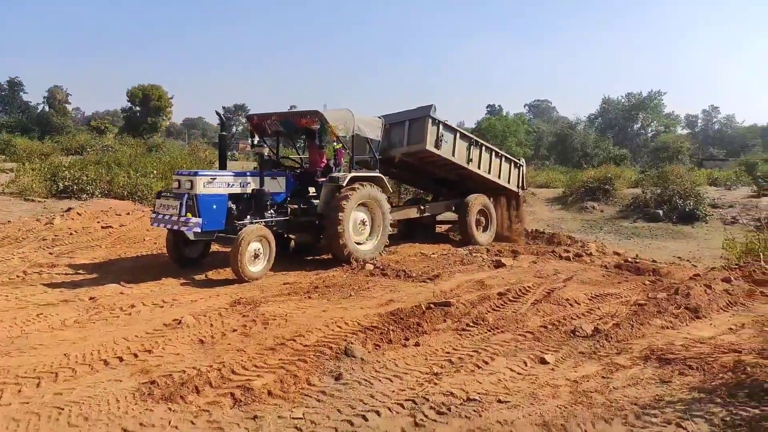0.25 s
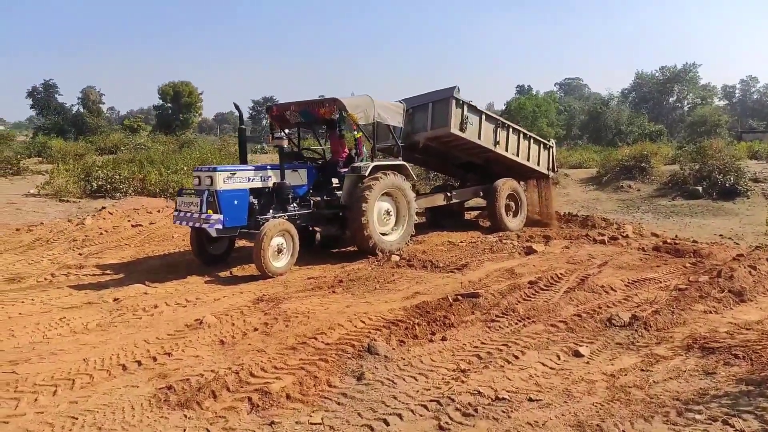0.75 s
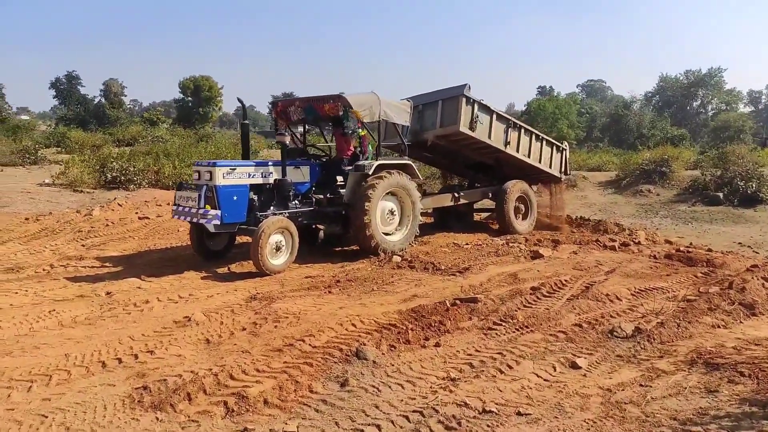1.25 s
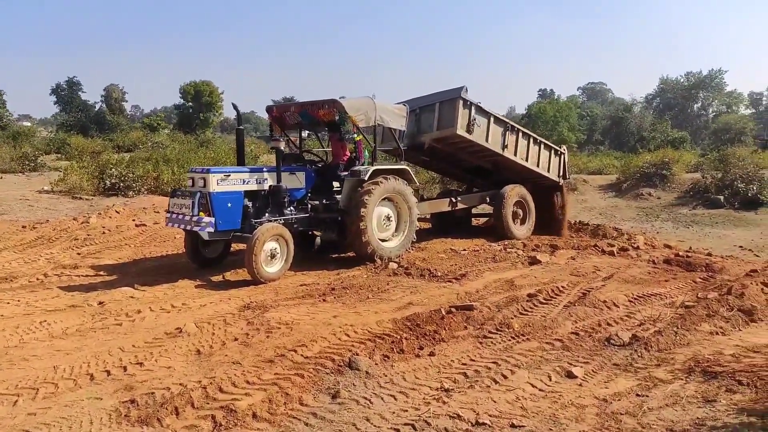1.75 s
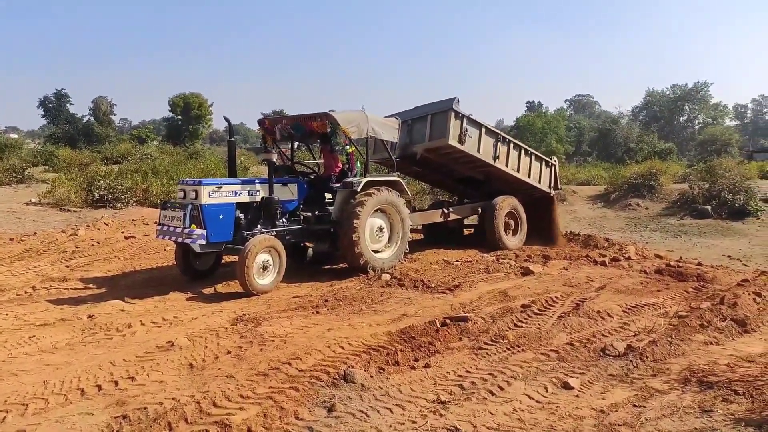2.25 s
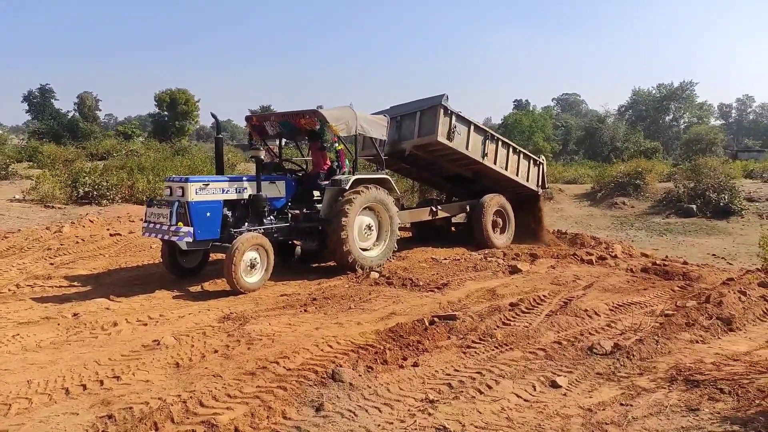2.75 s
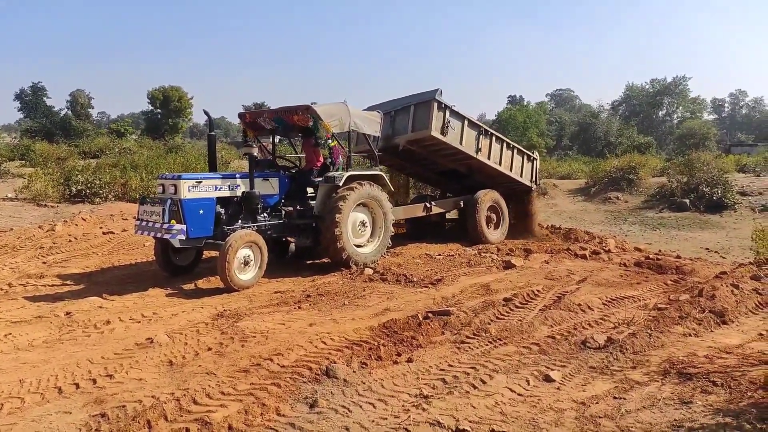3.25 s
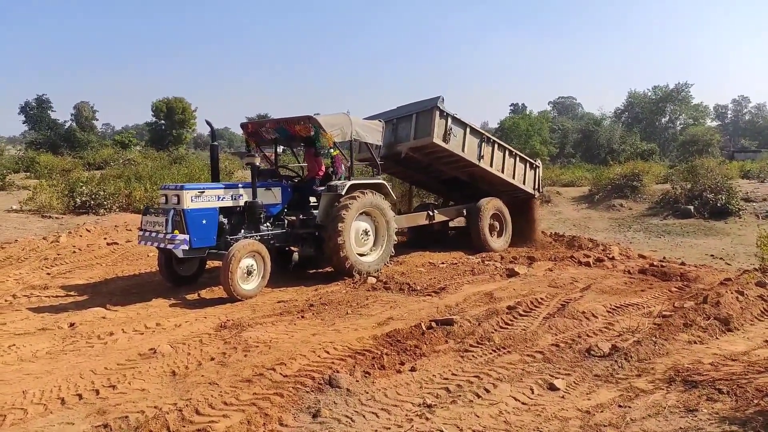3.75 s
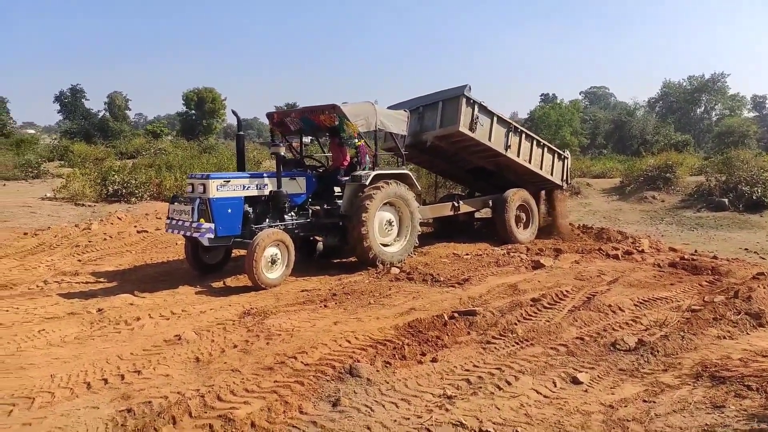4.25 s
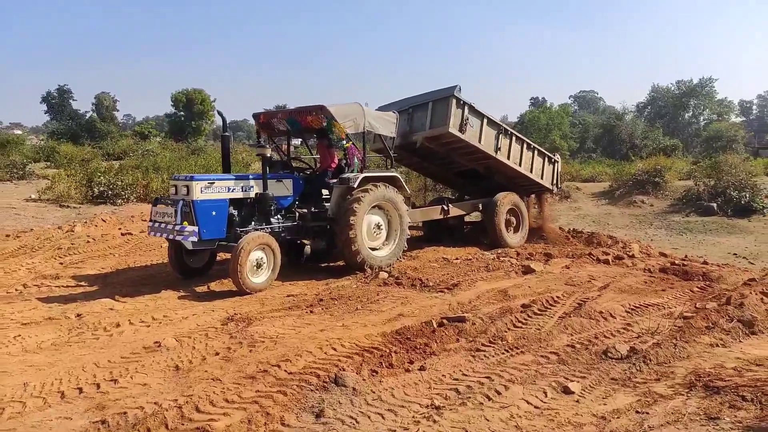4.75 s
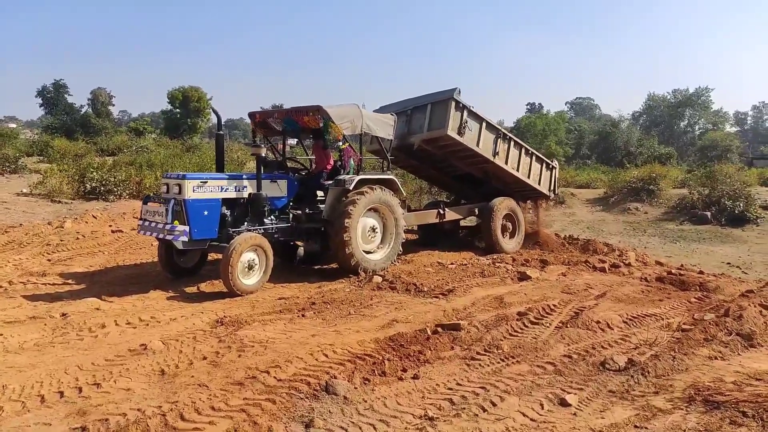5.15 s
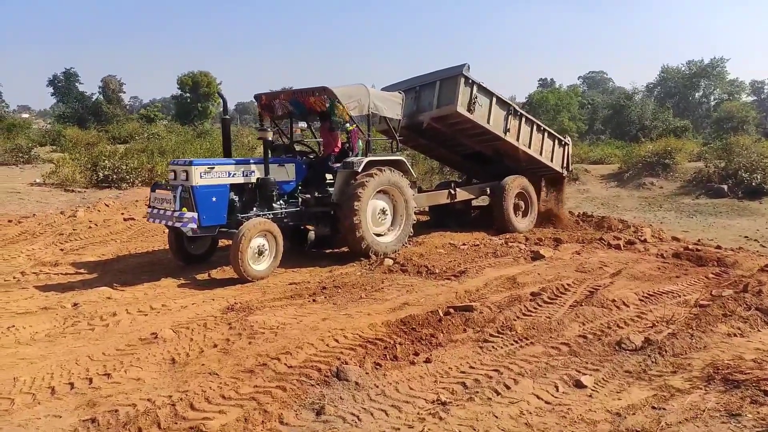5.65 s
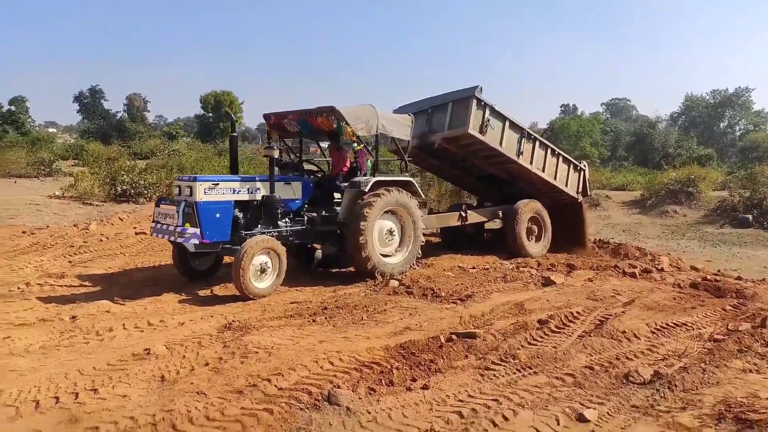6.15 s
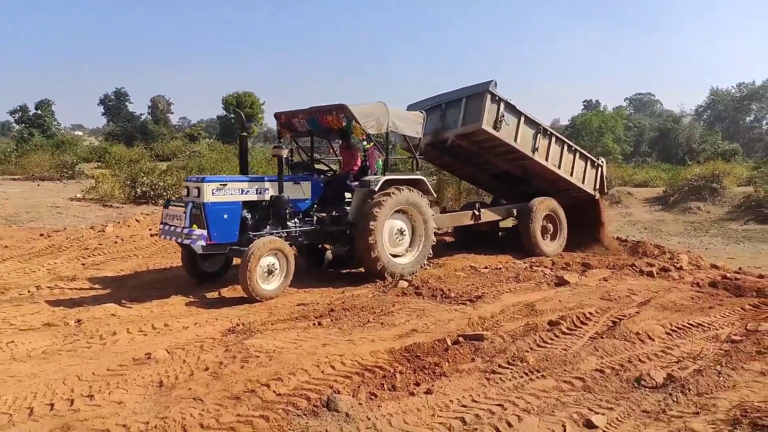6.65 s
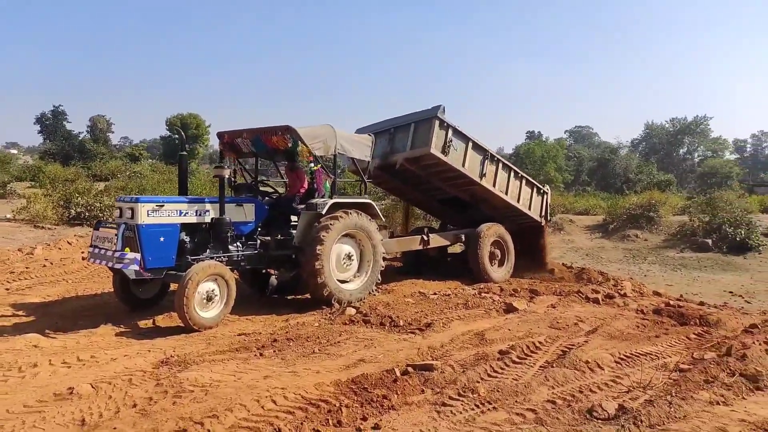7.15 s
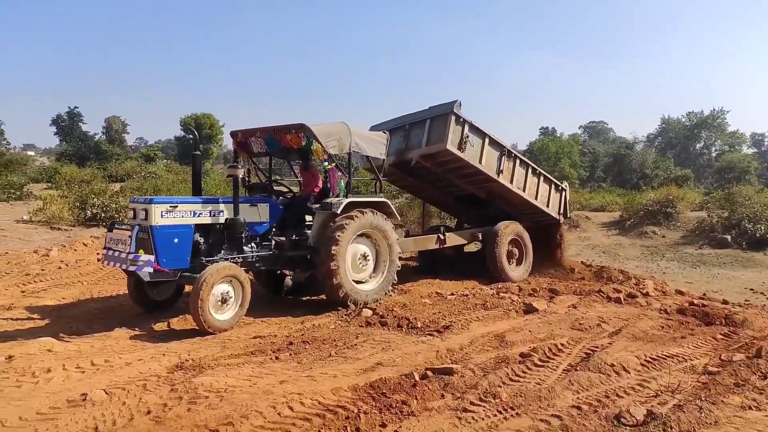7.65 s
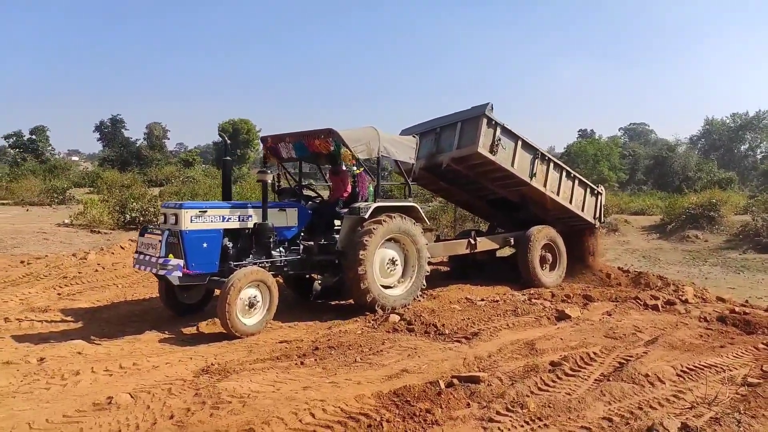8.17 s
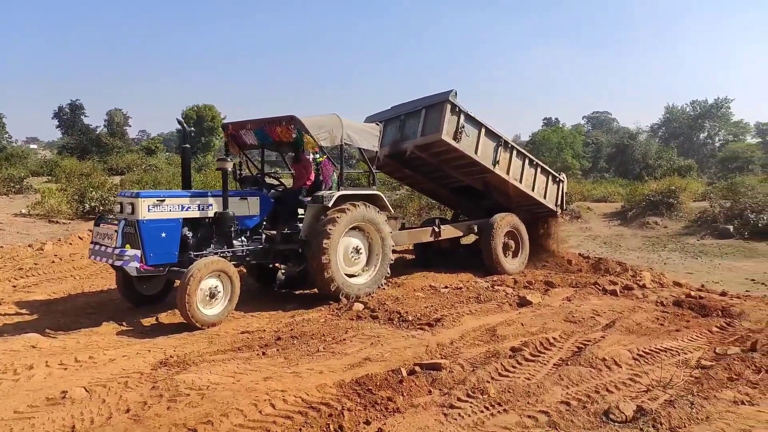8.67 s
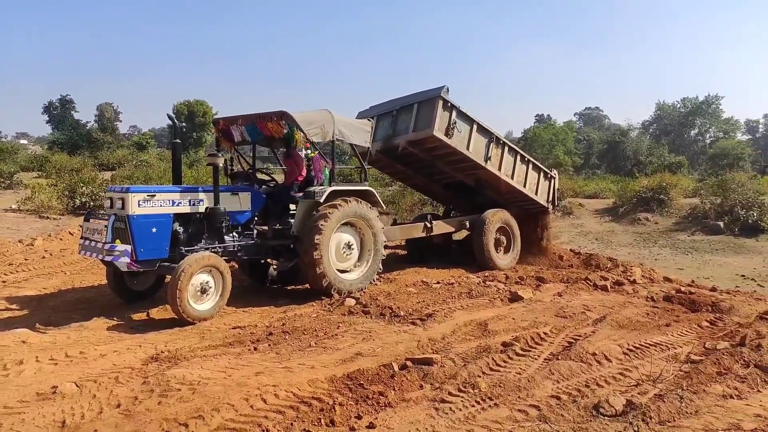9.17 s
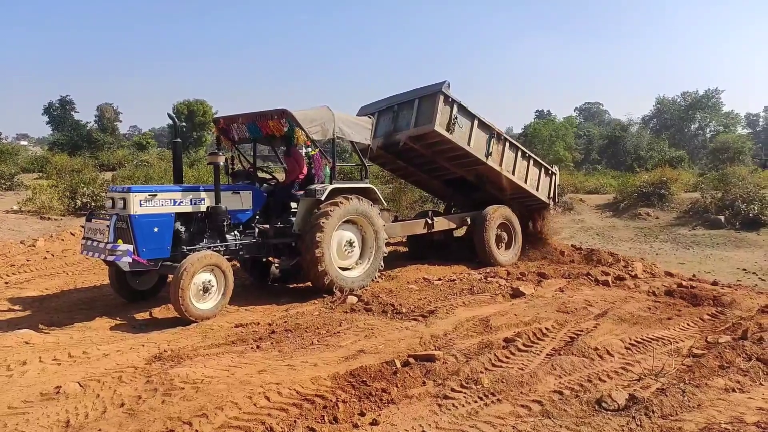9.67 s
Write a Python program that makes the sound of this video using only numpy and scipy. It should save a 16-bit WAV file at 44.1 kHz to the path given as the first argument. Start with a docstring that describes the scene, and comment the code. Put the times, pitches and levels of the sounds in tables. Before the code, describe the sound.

Loud, steady diesel clatter and pump whine with sliding earth, a falling coast-down, then lumpy idle knocks, a tailgate rattle and a wind buffet.

```python
"""A three-cylinder diesel tractor runs fast to drive the hydraulic ram of its tipping trailer. The throttle
shuts: it coasts down without firing, then catches at a slow, knocking idle that hunts. Stroke impulses ring
the pipe and the block, and sines on the engine's cycle whine. Soil, as grainy noise, slides out of the raised
steel body, which thuds and rattles in decaying noise; small parts ping, and a late gust buffets the left port."""
import sys
import numpy as np
from scipy import signal
from scipy.fft import rfft, irfft, next_fast_len
from scipy.io import wavfile
from scipy.ndimage import uniform_filter1d, map_coordinates

SR = 44100
rng = np.random.default_rng(int(sys.argv[2]) if len(sys.argv) > 2 else 0)


def store_pcm(level_fs):
    """Save levels as 16-bit WAV."""
    pcm = np.round(np.clip(level_fs, -1, 1) * 32767).astype(np.int16)
    wavfile.write(sys.argv[1], SR, np.atleast_2d(pcm).T)


N = 437031


def amp(db):
    """Decibels to gain."""
    return 10 ** (np.asarray(db) / 20)


def unit(x):
    """Scale to rms 1."""
    return x / np.sqrt(np.mean(x ** 2) + 1e-20)


def along(points, hz):
    """Read (hz, value) points on a log frequency axis."""
    f, v = np.transpose(points)
    return np.interp(np.log(hz + 1), np.log(f + 1), v)


def lifts(resonances, hz):
    """The dB that (centre_hz, width_hz, lift_db) resonances add at each frequency."""
    return sum(lift / (1 + (2 * (hz - centre) / width) ** 2) for centre, width, lift in resonances)


def clock():
    """The time of each sample in seconds."""
    return np.arange(N) / SR


def curve(rows):
    """Join (time_s, value) rows by straight lines, one value per sample."""
    return np.interp(clock(), *np.transpose(rows))


def after(s, fade):
    """A smooth step from 0 to 1 around time s."""
    return .5 + .5 * np.tanh((clock() - s) / fade)


def wobble(rate):
    """A smooth random curve, rate knots a second."""
    knots = rng.standard_normal(int(N * rate / SR) + 4)
    return map_coordinates(knots, [clock() * rate], order=2)


def filtered(x, response):
    """Shape x by a response given as a function of frequency."""
    m = next_fast_len(N + SR // 2)
    return irfft(rfft(x, m) * response(np.fft.rfftfreq(m, 1 / SR)), m)[..., :N]


def ring(x, spectrum, modes=(), size=32768):
    """Excite a causal, minimum-phase body that has the given spectrum and resonances."""
    hz = np.fft.rfftfreq(size, 1 / SR)
    cepstrum = irfft(np.log(amp(along(spectrum, hz) + lifts(modes, hz))))
    # fold the cepstrum forward in time so the body only rings after it is struck
    cepstrum[1:size // 2] *= 2
    cepstrum[size // 2 + 1:] = 0
    body = irfft(np.exp(rfft(cepstrum)))
    m = next_fast_len(N + size)
    return irfft(rfft(x, m) * rfft(body, m), m)[..., :N]


# likeness of the two microphone ports: hz, likeness (clipped to 0-1)
PORT_LIKENESS = [(170, 5.5), (300, 0.35), (700, 0.43), (1300, 0.4), (2600, 0.01), (5000, 0)]


def spread(pair, spectrum, panels=()):
    """Two unrelated signals ring a body and are mixed into a partly alike left and right at rms 1."""
    def mix(hz):
        turn = np.arccos(np.clip(along(PORT_LIKENESS, hz), 0, 1)) / 2
        return np.array([np.cos(turn), np.sin(turn)])
    mid, side = filtered(ring(pair, spectrum, panels), mix)
    return unit(np.array([mid + side, mid - side]))


def noise(patchy_db=0):
    """Two white noises, optionally with brief shared patches of stronger and weaker colour."""
    white = rng.standard_normal((2, N))
    if not patchy_db:
        return white
    bins = signal.stft(white, nperseg=256)[2]
    field = uniform_filter1d(rng.standard_normal(bins.shape[1:]), size=5, axis=0)
    field = unit(uniform_filter1d(field, size=14, axis=1))
    return signal.istft(bins * amp(patchy_db * field), nperseg=256)[1][:, :N]


# engine speed: time_s, stroke_rate_hz (strokes of all cylinders together)
ENGINE_SPEED = [(0.0, 36.07), (0.9, 36.72), (2.1, 36.68), (3.4, 35.69), (4.8, 35.16), (5.1, 32.29),
                (5.8, 25.04), (6.4, 20.14), (7.15, 13.08), (7.35, 14.55), (7.5, 14.3), (7.75, 14.54),
                (8.0, 14.7), (8.5, 14.86), (9.1, 14.83), (9.91, 14.99)]
FIRST_STROKE = .379  # strokes
CYLINDERS = 3
FREE_HZ = 36.7  # stroke rate running free at full throttle
FUEL_OFF, FUEL_ON = 4.81, 7.15  # s: the throttle shuts, the idle governor takes over


def crank():
    """Strokes made so far: a cylinder reaches the top at each whole number."""
    return np.cumsum(curve(ENGINE_SPEED)) / SR - FIRST_STROKE


def strokes(offset, uneven_db, scatter_db, jitter):
    """One row of impulses per cylinder, offset within its stroke; the cylinders differ in strength."""
    at = np.flatnonzero(np.diff(np.floor(crank() - offset), prepend=-np.inf) > 0)
    chance = rng.standard_normal((len(at), 2))
    cylinder = np.arange(len(at)) % CYLINDERS
    when = np.clip(at + jitter * SR * chance[:, 1], 0, N - 1).astype(int)
    strength_db = uneven_db * np.cos(2 * np.pi * cylinder / CYLINDERS) + scatter_db * chance[:, 0]
    blows = np.zeros((CYLINDERS, N))
    blows[cylinder, when] = amp(strength_db)
    return blows


def steady(x):
    """Even out x to rms 1 over every few strokes, whatever the engine speed."""
    power = np.mean(np.atleast_2d(x) ** 2, axis=0)
    power = uniform_filter1d(uniform_filter1d(power, size=SR // 4), size=SR // 4)
    return x / np.sqrt(np.abs(power) + 1e-12)


def sag():
    """How far the load has dragged the stroke rate down, in Hz, up to the moment the throttle shuts."""
    return FREE_HZ - np.interp(np.minimum(clock(), FUEL_OFF), *np.transpose(ENGINE_SPEED))


def halvings():
    """Octaves by which the engine turns slower than when it runs free."""
    return np.log2(FREE_HZ / curve(ENGINE_SPEED))


# hunting idle: moment of a full surge from which the swing dies, time between surges, time to settle (s)
SURGE_S, HUNT_S, SETTLE_S = 5.7, 0.392, 1.0


def surge():
    """The idle governor overshoots and hunts: fuel swings about its settled amount, less each time."""
    t = clock() - SURGE_S
    return np.cos(2 * np.pi * t / HUNT_S) * np.exp(-np.maximum(t, 0) / SETTLE_S)


# tone of the exhaust pipe under load, with the throttle shut, and at idle: hz, level_db
LOADED_PIPE = [(18, -15), (36, -4), (72, 6.5), (108, 9.5), (138, -17.5), (147, 1.5), (160, -21.5),
               (185, -17.5), (225, -30), (360, -32), (480, -23), (700, -34), (1500, -79.5)]
SLACK_PIPE = [(10, -26), (20, 2), (30, 18.5), (40, -1), (52, 14), (64, 1), (80, 11), (100, 5), (125, -15),
              (168, -18), (205, -23.5), (290, -27), (520, -46), (1500, -71)]
IDLE_PIPE = [(14, -2), (28, -28), (45, 13), (62, 3.5), (90, 6.5), (105, 6), (132, -22), (165, -3),
             (205, -26), (290, -26), (1500, -90)]
# pipe resonances that the falling harmonics sweep through: centre_hz, width_hz, lift_db
PIPE_RESONANCES = [(97.8, 10.5, 8.5), (157, 45, 5.5), (222.7, 8.7, 13.5), (297, 25, 11.5)]
# tone of the rushing gas and of the buzzing stack: hz, level_db
GAS_RUSH = [(20, -12), (120, -2), (170, 5), (200, -0.5), (400, -3), (900, -30)]
STACK_TONE = [(70, -9), (135, 9), (220, -1), (300, -5.5), (380, -6), (1500, -64)]
# drone under load: level at the free-running rate (dB), change as the load drags it down (dB per Hz)
DRONE_DB, DRONE_DB_PER_HZ = -24, 0.8
# coasting: level at the free-running rate (dB), loss for each halving of the rate (dB)
PUMPING_DB, PUMPING_LOSS_DB = -30, 6
# idle: settled level (dB), lift by a full surge (dB)
THUMP_DB, THUMP_SWING_DB = -35.5, 1


def exhaust(flow_power=3):
    """Each stroke puffs into the pipe: a hard drone under load, even pumping on the coast, loose idle thumps."""
    slack, idling = after(FUEL_OFF, fade=0.0098), after(FUEL_ON, fade=0.083)
    hard_firing = strokes(offset=.56, uneven_db=.25, scatter_db=.15, jitter=.00003).sum(axis=0)
    pumping = strokes(offset=.8, uneven_db=.3, scatter_db=.7, jitter=.00007).sum(axis=0)
    firing = strokes(offset=.81, uneven_db=-0.2, scatter_db=1.0, jitter=0.00032).sum(axis=0)
    drone = steady(ring(-hard_firing, LOADED_PIPE))
    drone = amp(DRONE_DB + DRONE_DB_PER_HZ * sag()) * drone
    puffs = steady(ring(-pumping, SLACK_PIPE, PIPE_RESONANCES))
    puffs = amp(PUMPING_DB - PUMPING_LOSS_DB * halvings()) * puffs
    thumps = steady(ring(-firing, IDLE_PIPE))
    thumps = amp(THUMP_DB + THUMP_SWING_DB * surge()) * thumps
    # the faster the engine turns, the more gas rushes and, off load, buzzes through the stack
    flow = (curve(ENGINE_SPEED) / FREE_HZ) ** flow_power
    rush = amp(-50) * flow * spread(noise(), GAS_RUSH)
    buzz = amp(-36.0) * flow * slack * steady(ring(-pumping, STACK_TONE, PIPE_RESONANCES))
    return (1 - slack) * drone + slack * (1 - idling) * puffs + idling * thumps + rush + buzz


# share of the block's sound that repeats with each engine cycle: hz, power_share
REPEATING = [(400, .8), (1100, .68), (2500, .5), (6000, .15)]
# ringing panels of the block: centre_hz, width_hz, lift_db
BLOCK_PANELS = [(353, 3.6, 12), (728, 51, 4.5), (916, 26, 5), (1005, 77, 5.5), (1120, 41, 5),
                (1441, 22, 8.5), (1523, 48, 6), (2130, 260, 4.5), (2667, 34, 8), (3223, 98, 8.5),
                (3540, 86, 6.5), (6090, 56, 9)]


def knocks(blows, spectrum, t60, attack):
    """Blows shake the block: the lows ring much alike each time a cylinder fires, the treble rattles anew."""
    t = np.arange(SR // 5) / SR
    decay = amp(-60 * t / t60) * (1 - np.exp(-t / attack))
    voices = decay * rng.standard_normal((CYLINDERS, 2, len(t)))
    same = unit(signal.oaconvolve(blows[:, None], voices, axes=2).sum(axis=0)[:, :N])
    power = signal.oaconvolve(blows.sum(axis=0) ** 2, decay ** 2)[:N]
    fresh = unit(np.sqrt(np.abs(power)) * noise(patchy_db=1))
    alike = filtered(same, lambda hz: np.sqrt(along(REPEATING, hz)))
    anew = filtered(fresh, lambda hz: np.sqrt(1 - along(REPEATING, hz)))
    return steady(spread(alike + anew, spectrum, BLOCK_PANELS))


# firings that bang hard as the engine catches and hunts: time_s, level_db (over a plain blow)
HARD_BANGS = [(7.3547, 4), (7.769, 3), (7.970, 2.5), (8.175, 3.5)]


def with_bangs(blows):
    """The firing nearest to each bang ignites at that moment instead, at the bang's own strength."""
    blows = blows.copy()
    cylinders, times = np.nonzero(blows)
    for s, db in HARD_BANGS:
        k = np.argmin(np.abs(times - s * SR))
        blows[cylinders[k], times[k]] = 0
        blows[cylinders[k], round(s * SR)] = amp(db)
    return blows


# parts that clank when a cylinder fires, one row per cylinder: delay_s, pitch_hz, loaded_db, idle_db
# (peak levels for a plain blow, before the scatter)
CLANKING_PARTS = [
    [(.002, 3150, -47, -53), (.005, 1080, -41.5, -36.5), (.008, 2123, -37.5, -49), (.012, 356, -44, -41.5)],
    [(.001, 2385, -35, -39), (.003, 740, -42, -37), (.010, 922, -35.5, -42), (.012, 365, -39, -41)],
    [(.0005, 1490, -31.5, -38), (.012, 1520, -26.5, -41), (.012, 355, -37, -39.5)],
]
CLANK_SCATTER_DB, CLANK_DETUNE = 1.6, .014  # change from blow to blow: dB, share of the pitch


def clanks(blows, idling, t60=.038, attack=.0015):
    """Each cylinder strikes its own parts of the engine, so the same clanks come round once a cycle."""
    t, sound = np.arange(SR // 10) / SR, np.zeros(N)
    decay = amp(-60 * t / t60) * (1 - np.exp(-t / attack))
    decay = decay / decay.max()
    for own_blows, parts in zip(blows, CLANKING_PARTS):
        for at in np.flatnonzero(own_blows):
            for delay, hz, loaded_db, idle_db in parts:
                size, detune = rng.standard_normal(2)
                level_db = idle_db if idling else loaded_db
                gain = own_blows[at] * amp(level_db + CLANK_SCATTER_DB * size)
                tone = np.sin(2 * np.pi * hz * (1 + CLANK_DETUNE * detune) * t)
                room = sound[at + int(abs(delay) * SR):][:len(t)]  # a view: adding to it adds to sound
                room += (gain * decay * tone)[:len(room)]
    return sound


# colour of the loaded knock, the idle knock and the gear clatter: hz, level_db (per Hz)
LOADED_KNOCK_COLOUR = [(30, -17), (170, -0.5), (350, -1), (470, -4), (600, -9), (760, -9.5), (1100, -2),
                       (1280, -5.5), (1650, -1.5), (1880, -12.5), (2400, -2), (3000, -17.5), (4500, -22.5),
                       (7500, -18.5), (9200, -31), (13500, -27)]
IDLE_KNOCK_COLOUR = [(100, 4.5), (170, -6), (215, -0.5), (290, 3.5), (400, -1.5), (520, -15.5), (720, -9),
                     (950, -3), (1350, -6), (1800, -9), (2500, -9.5), (3050, -17), (3600, -13), (4200, -20),
                     (7600, -18.5), (9500, -30), (13500, -28)]
GEAR_COLOUR = [(60, -7), (160, 5), (300, -2), (500, -4), (750, -0.5), (1050, 0), (1300, -9.5), (1600, -2.5),
               (1850, -7), (2300, -6.5), (3000, -12), (4800, -18), (7500, -18), (9500, -25), (13500, -25)]
# under load: level at the free-running rate (dB), change as the load drags it down (dB per Hz)
HARD_KNOCK_DB, HARD_KNOCK_DB_PER_HZ = -33.5, -0.93
# coasting: level at the free-running rate (dB), loss for each halving of the rate (dB)
COAST_CLATTER_DB, COAST_CLATTER_LOSS_DB = -35, 8.5
# idle: settled levels (dB), change of the knock at a full surge (dB)
IDLE_KNOCK_DB, IDLE_CLATTER_DB, KNOCK_SWING_DB = -40.5, -45.5, -1


def block():
    """Diesel knock while fuel is injected; gears and valves clatter all the time."""
    loaded, idling = 1 - after(FUEL_OFF - .03, fade=0.074), after(FUEL_ON, fade=.02)
    coasting = (1 - loaded) * (1 - idling)
    fast_blows = strokes(offset=-.07, uneven_db=.4, scatter_db=.6, jitter=.00004)
    slow_blows = with_bangs(strokes(offset=-.03, uneven_db=0.3, scatter_db=1.0, jitter=.0002))
    taps = sum(strokes(offset=at, uneven_db=.5, scatter_db=.8, jitter=.00005) for at in (.22, .6))
    hard = knocks(fast_blows, LOADED_KNOCK_COLOUR, t60=.085, attack=.001)
    idle = knocks(slow_blows, IDLE_KNOCK_COLOUR, t60=.11, attack=.001)
    clatter = knocks(taps, GEAR_COLOUR, t60=0.57, attack=0.0009)
    hard_gain = loaded * amp(HARD_KNOCK_DB + HARD_KNOCK_DB_PER_HZ * sag())
    idle_gain = idling * amp(IDLE_KNOCK_DB + KNOCK_SWING_DB * surge())
    coast_gain = coasting * amp(COAST_CLATTER_DB - COAST_CLATTER_LOSS_DB * halvings())
    clatter_gain = hard_gain + coast_gain + idling * amp(IDLE_CLATTER_DB)
    metal = loaded * clanks(fast_blows, idling=False) + idling * clanks(slow_blows, idling=True)
    return hard_gain * hard + idle_gain * idle + clatter_gain * clatter + metal


# tones of the engine and its hydraulic pump:
# multiple (of the engine's full cycle), body_low_db, body_high_db (rms levels, before the wobble)
WHINE_TONES = [(14, -41, -42), (15, -44, -50), (21, -56, -51), (24, -51, -48), (27, -50, -50),
               (30, -49, -41), (33, -49, -52), (62, -55, -50), (73, -52, -60), (87, -56, -53),
               (94, -63, -52)]


def whines():
    """The labouring engine and pump sing on multiples of the engine's cycle; the balance shifts as the body rises."""
    cycles, risen = crank() / CYLINDERS, np.minimum(clock() / FUEL_OFF, 1)
    tones = np.zeros(N)
    for multiple, low_db, high_db in WHINE_TONES:
        gain = amp(low_db + (high_db - low_db) * risen + 2 * wobble(5))
        tones += gain * np.sin(2 * np.pi * multiple * cycles + .4 * wobble(10))
    return np.sqrt(2) * tones * (1 - after(FUEL_OFF + 0.043, fade=0.045))


def air():
    """Low outdoor rumble, and a light breeze that touches each port separately."""
    rumble = spread(noise(), [(10, -24), (40, -4), (110, 0.0), (250, -12.5), (8000, -42.5)])
    breeze_colour = [(10, -32), (35, 9), (100, -4), (600, -53)]
    breeze = unit(filtered(noise(), lambda hz: amp(along(breeze_colour, hz))))
    return amp(-45) * rumble + amp(-48 + 1.5 * wobble(3)) * breeze


# colour of sliding soil: hz, level_db (per Hz)
SOIL_COLOUR = [(200, -17), (700, -10), (1300, -4.5), (3300, -8.5), (4500, -9), (7500, -8.5), (9500, -22.5),
               (13500, -17.5)]
# soil pouring off the trailer: full_flow_s, end_s, level_db (at full flow), build_up_db_per_s
SOIL_POURS = [(1.713, 3.093, -42, 10), (3.552, 4.6, -42.5, 20), (6.103, 6.538, -49, 31)]
# big clods that break away and burst: time_s, level_db (before attack and decay)
BURSTING_CLODS = [(6.281, -35), (6.486, -32.5)]
CLOD_ATTACK_S, CLOD_T60_S = 0.006, 0.15
# thinning from full flow on, extra fall after the end, and what keeps falling
POUR_THINS_DB_PER_S, POUR_STOPS_DB_PER_S, TRICKLE_DB = 3, 25, -58


def soil(grain_db=3.5):
    """Crumbs and clods hiss down the steel floor; each pour builds up, thins and stops."""
    t, flow = clock(), amp(TRICKLE_DB)
    for start, end, db, build in SOIL_POURS:
        rise = build * np.maximum(start - t, 0)
        fall = POUR_THINS_DB_PER_S * np.maximum(t - start, 0) + POUR_STOPS_DB_PER_S * np.maximum(t - end, 0)
        flow = np.hypot(flow, amp(db - rise - fall))
    for s, db in BURSTING_CLODS:
        age = np.maximum(t - s, 0)
        burst = amp(db - 60 * age / CLOD_T60_S) * (1 - np.exp(-age / CLOD_ATTACK_S))
        flow = np.hypot(flow, burst)
    grains = noise(patchy_db=3.5) * amp(grain_db * wobble(700) + 0.42 * wobble(13))
    return flow * spread(grains, SOIL_COLOUR)


# blows on the trailer body: time_s, thud_db, rattle_db (before a common lift of 1.5 dB), t60_s
BODY_BUMPS = [(6.281, -52, -34.5, 0.14), (6.378, -55, -38, 0.093), (6.485, -43, -34.5, 0.17),
              (6.86, -31.5, -48, 0.33), (9.376, -38, -29, 0.2), (9.452, -55, -44.5, 0.8),
              (9.585, -50, -38, 0.1)]
# colour of the thuds and of the rattles: hz, level_db
THUD_COLOUR = [(50, -19), (90, 15.5), (160, -1), (330, -3), (1500, -41)]
RATTLE_COLOUR = [(200, -15), (480, 8), (1000, 5), (2200, 1), (3000, -3), (13500, -21.5)]
# modes of the steel tailgate: centre_hz, width_hz, lift_db
TAILGATE_MODES = [(549, 30, 8), (800, 40, 8), (1147, 40, 13), (1985, 70, 14), (3575, 70, 14)]


def trailer(chatter_db=5):
    """Shifting soil thumps the body, and the steel tailgate chatters against its stops and rings."""
    thuds, rattles = np.zeros(N), np.zeros(N)
    for s, thud_db, rattle_db, t60 in BODY_BUMPS:
        t = np.maximum(clock() - s, 0)
        decay = amp(-60 * t / t60) * (1 - np.exp(-t / 0.0021))
        thuds += amp(thud_db) * decay
        rattles += amp(rattle_db) * decay
    contacts = rattles * unit(noise() * amp(chatter_db * wobble(2000)))
    # spread() returns rms 1, so the strength of the contacts is put back
    tailgate = amp(1.5) * contacts.std() * spread(contacts, RATTLE_COLOUR, TAILGATE_MODES)
    return thuds * spread(noise(), THUD_COLOUR) + tailgate


# small steel parts that ping now and then, the one at 9.545 s on the tailgate: time_s, pitch_hz, level_db
# (before attack and decay)
METAL_PINGS = [(6.755, 3300, -45), (7.698, 6350, -35.5), (8.109, 6200, -33.5), (9.545, 3380, -38),
               (9.724, 7520, -45)]


def pings(t60=0.08):
    """Now and then a small steel part, on the engine or the tailgate, rings: a decaying sine with an unsteady
    phase."""
    sound = np.zeros(N)
    for s, hz, db in METAL_PINGS:
        t = np.maximum(clock() - s, 0)
        tone = np.sin(2 * np.pi * hz * t + 0.8 * wobble(270))
        sound += amp(db - 60 * t / t60) * tone * (1 - np.exp(-t / 0.00091))
    return sound


# gusts on the left port alone: peak_s, level_db, swell_and_die_s (time constant each way)
LEFT_GUSTS = [(9.05, -34, 0.027), (9.14, -16, 0.0051), (9.24, -28.5, 0.071), (9.9, -25, 0.054)]
# colour of the buffeting: hz, level_db
BUFFET_COLOUR = [(20, -7), (70, 3.5), (160, -0.5), (240, -3.5), (350, -13), (2000, -53)]


def gust():
    """Wind tumbles over the left microphone port in short gusts that swell and die."""
    strength = sum(amp(db) * np.exp(-np.abs(clock() - s) / width) for s, db, width in LEFT_GUSTS)
    left_only = np.array([[1], [0]])
    return left_only * strength * spread(noise(), BUFFET_COLOUR)


# balance of the ports: hz, left_minus_right_db
PORT_BALANCE = [(35, -6), (110, 1.7), (200, -4), (370, -2), (680, 2.5), (1250, -4.5), (2290, -6.5),
                (4200, -1), (7720, -2), (14200, -2.5)]
# arrival at the ports: hz, left_lead_s
LEFT_LEAD = [(700, 0.000083), (1200, 0.00027)]


def scene():
    """The tractor stands a little to the left, so the left port hears it first; the gust is left alone."""
    sound = exhaust() + block() + whines() + air() + soil() + trailer() + pings()
    sides = np.array([[.5], [-.5]])  # half of each difference goes to each port

    def placing(hz):
        lead = np.exp(2j * np.pi * hz * along(LEFT_LEAD, hz) * sides)
        return amp(sides * along(PORT_BALANCE, hz)) * lead
    return filtered(sound, placing) + gust()


TOP_HZ = 14350


def record(dry):
    """Nothing is kept at or above the band limit."""
    return filtered(dry, lambda hz: hz < TOP_HZ)


dry = scene()
out = record(dry)
store_pcm(out)
```